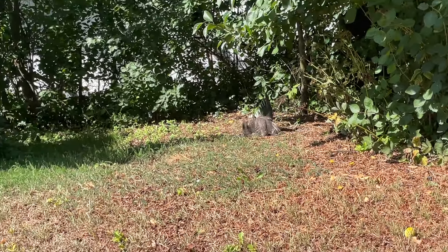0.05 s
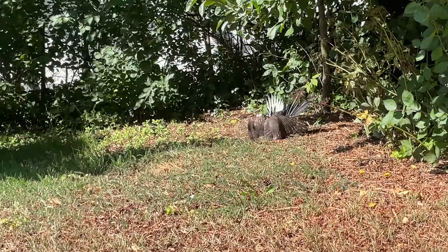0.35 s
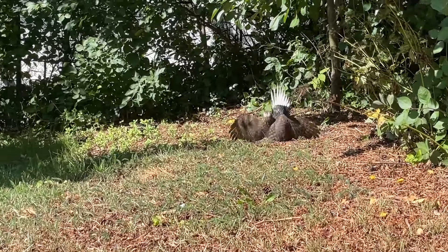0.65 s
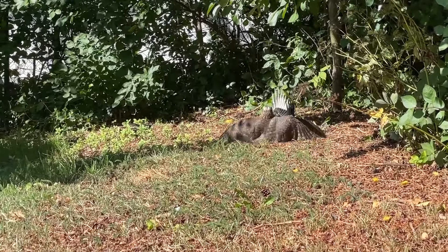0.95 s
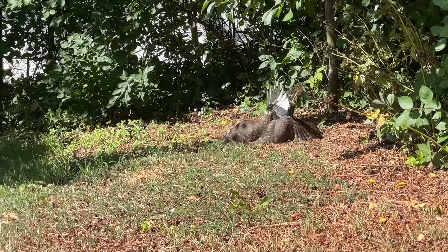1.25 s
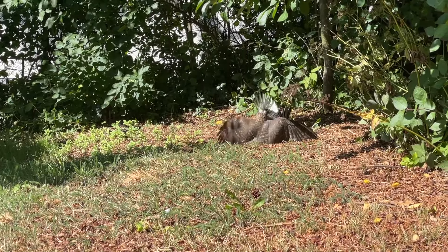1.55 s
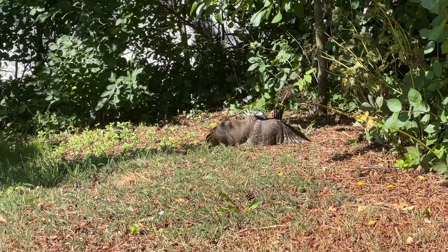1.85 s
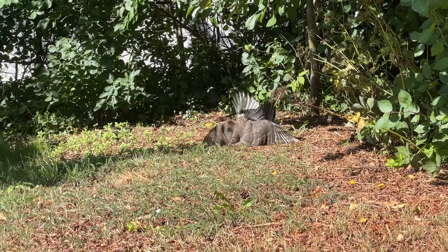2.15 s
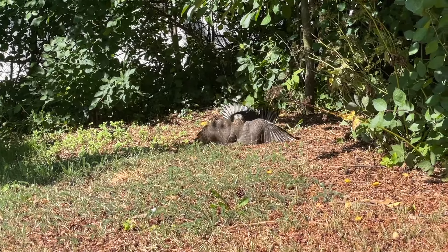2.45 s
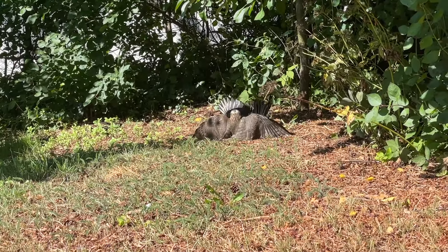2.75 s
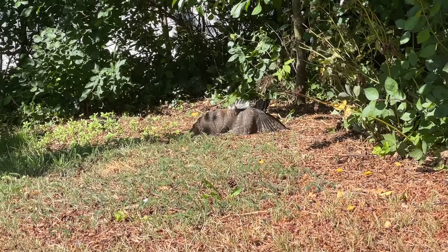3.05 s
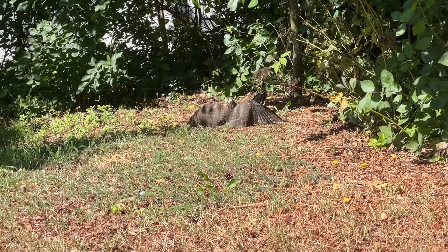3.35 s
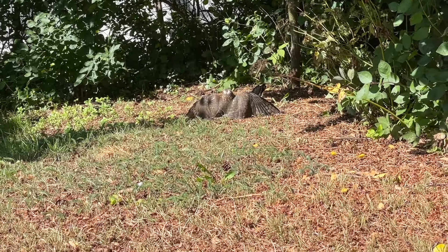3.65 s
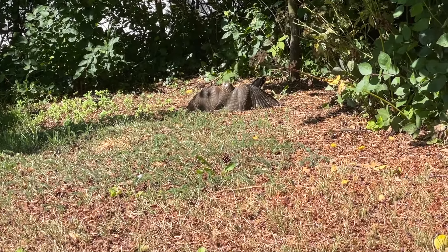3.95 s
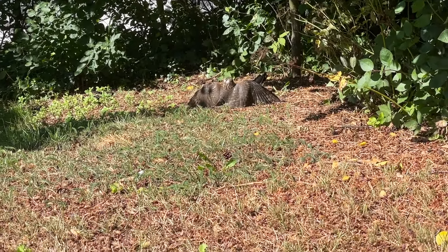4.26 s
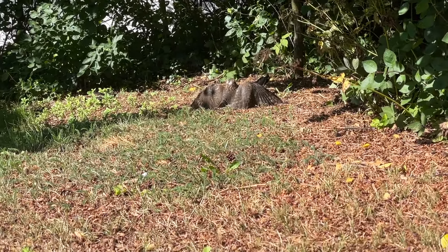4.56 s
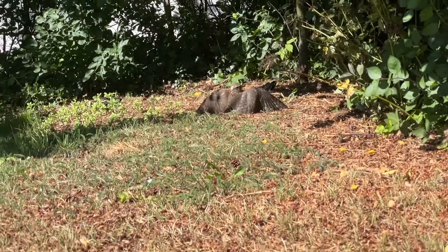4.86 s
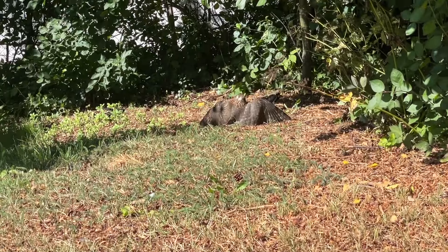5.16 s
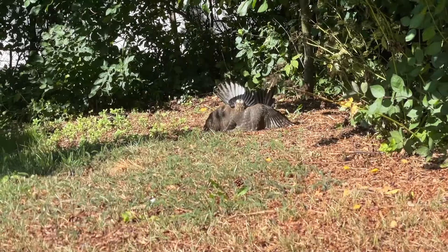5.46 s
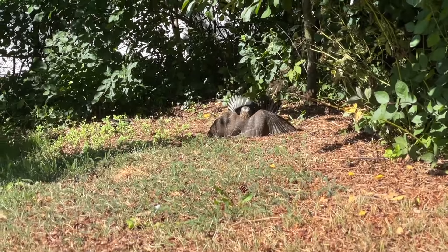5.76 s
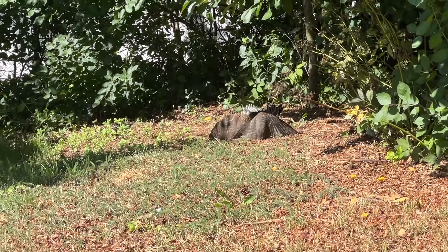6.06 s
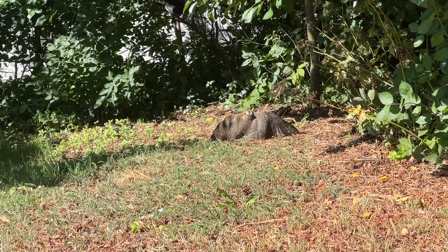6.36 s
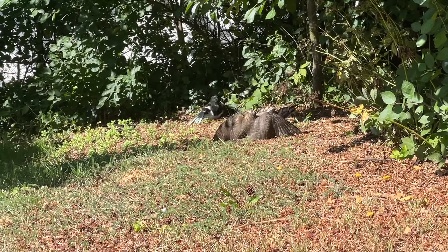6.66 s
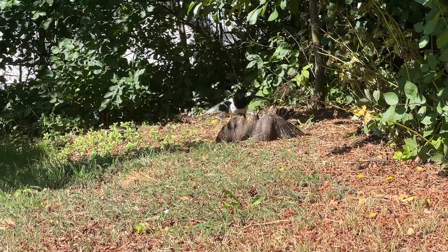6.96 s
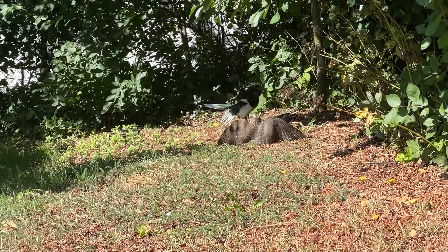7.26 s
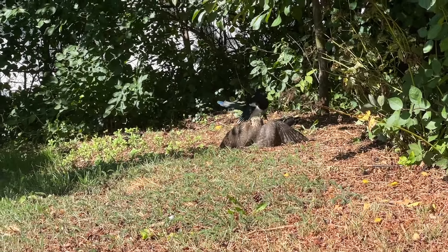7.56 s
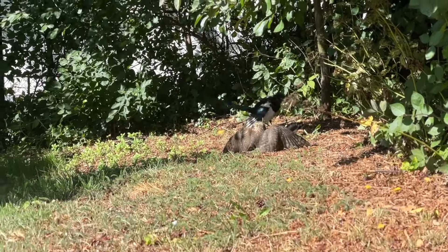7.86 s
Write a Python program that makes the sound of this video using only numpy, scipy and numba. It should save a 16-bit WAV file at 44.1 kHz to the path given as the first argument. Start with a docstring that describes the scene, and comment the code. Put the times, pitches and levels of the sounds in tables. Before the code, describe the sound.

A magpie screams in distress on a garden lawn, several metres away, with a slight echo from a hedge. It opens with a brief rasp and a long nasal wail lasting to 0.8 seconds. An arching squawk breaks into a rasp around 1 second, followed by another wail that drops in pitch and more squawks from 1.6 to 2.4 seconds. From about 2.4 to 4 seconds comes the loudest part, a fast stuttering run of harsh chatter, roughly ten notes a second. The bird pauses until 5.2 seconds, when a rising squawk leads into a wail lasting to 6.4 seconds. A more strained, piercing wail runs from 6.6 to 7.3 seconds, and a weaker raspy call follows from 7.6 seconds to the end near 8. A faint outdoor rumble and distant hum lie underneath, with occasional soft wind thumps on the microphone.

```python
"""Magpie in distress on a lawn

A magpie screams some metres away, in front of a hedge. Membranes on the two sides of its syrinx chop
the breath into pulses, which throat and beak filter. Arching squawks from the high side break into rasps
and settle into long nasal wails from the low side; in the middle comes a fast run of harsh chatter.
The hedge scatters it all back over a faint outdoor rumble."""
import sys
import numpy as np
from scipy import signal
from scipy.fft import rfft, irfft, next_fast_len
from scipy.io import wavfile
from scipy.ndimage import uniform_filter1d
from numba import njit

SR = 44100
rng = np.random.default_rng(int(sys.argv[2]) if len(sys.argv) > 2 else 0)


def wav_record(signal):
    """Record a signal, one row per channel, as 16-bit PCM in the file named by sys.argv[1]."""
    frames = np.transpose(np.atleast_2d(signal))
    bounded = np.clip(frames, -1, 1)
    # unit amplitude maps onto the largest positive 16-bit level
    quanta = np.round(bounded * 32767).astype(np.int16)
    wavfile.write(sys.argv[1], SR, quanta)


N = 349261
TIME = np.arange(N) / SR
SIZE = next_fast_len(N + SR)
FREQS = np.maximum(np.arange(SIZE // 2 + 1) * SR / SIZE, 1)


def from_db(db):
    """Amplitude ratio of a level in decibels."""
    return 10 ** (np.asarray(db) / 20)


def ramp(x):
    """Limit to the range 0 to 1."""
    return np.clip(x, 0, 1)


def rms_one(x):
    """Normalise to rms 1."""
    return x / np.sqrt(np.mean(x ** 2) + 1e-20)


def levelled(x, size=900):
    """Hold the moving rms over `size` samples near 1."""
    return x / np.sqrt(np.abs(uniform_filter1d(x ** 2, size)) + 1e-12)


def in_time(rows):
    """Interpolate each column of a time curve at every sample."""
    times, *columns = np.transpose(rows)
    return [np.interp(TIME, times, column) for column in columns]


def per_call(curves):
    """Interpolate the curve of the nearest call, held beyond its ends."""
    columns = in_time(curves[0])
    for before, curve in zip(curves, curves[1:]):
        columns = np.where(TIME > (before[-1][0] + curve[0][0]) / 2, in_time(curve), columns)
    return columns


def at_hz(points, hz):
    """Interpolate a spectrum on a log-frequency axis."""
    f, value = np.transpose(points)
    return np.interp(np.log(hz), np.log(f), value)


def low_pass(hz, power):
    """Zero-phase low-pass response, half amplitude at hz."""
    return 1 / (1 + (FREQS / hz) ** power)


def filtered(x, response):
    """Convolution, as a product of spectra."""
    return irfft(rfft(x, SIZE) * response, SIZE)[..., :N]


def coloured(x, spectrum):
    """Spectral shaping by a curve in decibels; rms 1."""
    return rms_one(filtered(x, from_db(at_hz(spectrum, FREQS))))


def flutter(rate_hz):
    """Random modulation up to about the given rate; rms 1."""
    return rms_one(filtered(rng.standard_normal(N), low_pass(rate_hz, 2)))


def band_noise(hz, sharpness):
    """Band-pass noise around one frequency; rms 1."""
    detuning = FREQS / hz - hz / FREQS
    return rms_one(filtered(rng.standard_normal(N), 1 / (1 + (sharpness * detuning) ** 2)))


def wide_noise(spectrum, side_db):
    """Noise from all around is only partly coherent between left and right."""
    mid, side = coloured(rng.standard_normal((2, N)), spectrum)
    return mid + from_db(side_db) * side * [[1], [-1]]


@njit
def resonance(x, hz, width_hz):
    """A damped resonator with a moving centre frequency and peak gain 1."""
    r = np.exp(-np.pi * width_hz / SR)
    y = np.zeros(len(x))
    for i in range(2, len(x)):
        drive = (1 - r * r) / 2 * (x[i] - x[i - 2])
        y[i] = drive + 2 * r * np.cos(2 * np.pi * hz[i] / SR) * y[i - 1] - r * r * y[i - 2]
    return y


def breeze(gain_db=0.5, gust_db=1.8):
    """Pressure fluctuations of moving air make a rumble, which freshens once."""
    # strength of the breeze: t/s, level/dB
    strength = [(0, -63), (2.9, -62.5), (4.2, -58.5), (4.7, -56.5), (7.92, -57.5)]
    # spectrum of the rumble: f/Hz, relative density/dB
    spectrum = [(20, -26), (55, -1.5), (90, -5.5), (160, -13), (300, -19.5), (1000, -49), (15000, -82)]
    level_db = in_time(strength)[0] + gain_db + gust_db * flutter(4)
    return from_db(level_db) * wide_noise(spectrum, side_db=-17)


def distant_noise(level_db=-63.5, rush_hz=295):
    """Two noises superpose: a steady distant one and a low rush that swells behind the chatter."""
    # distant background: f/Hz, relative density/dB
    spectrum = [(40, -10), (150, 0), (280, -5), (500, -8.5), (1000, -10), (2000, -20), (3000, -23),
                (4500, -37), (8000, -43), (15000, -49.5)]
    # swell of the rush: t/s, level/dB
    swell = [(2.3, -93), (2.4, -64.5), (3, -64), (3.3, -61), (3.45, -86)]
    steady = from_db(level_db) * wide_noise(spectrum, side_db=-5)
    return steady + from_db(in_time(swell)[0]) * band_noise(rush_hz, sharpness=2.4)


def far_hum(hz=735):
    """A faint pure tone, randomly modulated in amplitude and frequency."""
    # swell and fade of the hum: t/s, level/dB
    swell = [(0, -66.5), (4.1, -64.5), (5.1, -71.5), (7.92, -68)]
    amplitude = np.sqrt(2) * from_db(in_time(swell)[0] + 2 * flutter(11))
    phase = 2 * np.pi * np.cumsum(hz + 3 * flutter(5.4)) / SR
    return amplitude * np.sin(phase + [[1], [-1]])


def wind_puffs(width_s=0.034, hz=50):
    """Brief pressure swings of air on the microphones make soft low thumps."""
    # crests of the puffs: t/s, level/dB
    puffs = [(.70, -50), (.95, -52), (1.72, -53), (3.08, -50), (3.46, -49), (4.15, -49), (4.57, -55.5),
             (4.93, -50.5), (5.11, -51.5), (6.455, -43), (7.121, -53), (7.24, -48.5), (7.33, -43),
             (7.62, -47.5)]
    envelope = sum(from_db(db) * np.exp(-((TIME - s) / width_s) ** 2) for s, db in puffs)
    return envelope * levelled(band_noise(hz, sharpness=1), size=2000)


def garden(x, near_db=-11, hedge_db=-22, tail_db=-15, hedge_s=0.032, spread_s=0.03):
    """Scattering: a quick echo from leaves and trunks, a later one from the hedge, then a dull tail."""
    # reverberation time of the garden: f/Hz, T60/s
    t60 = [(500, 0.9), (2000, 0.51), (5000, 0.4), (12000, 0.37)]
    t = TIME[:SR]
    near = rng.standard_normal(SR) * (rng.random(SR) < .05) * np.exp(-t / .011) * (t > .002)
    hedge = band_noise(hz=2150, sharpness=2.91)[:SR] * np.exp(-((t - hedge_s) / spread_s) ** 2)
    edges_hz, tail = np.geomspace(300, 16000, 7), 0
    for low, high in zip(edges_hz, edges_hz[1:]):
        band_pass = signal.butter(2, [low, high], "band", fs=SR, output="sos")
        band = signal.sosfilt(band_pass, rng.standard_normal(SR))
        tail = tail + band * from_db(-60 * t / at_hz(t60, np.sqrt(low * high))) * (t > .012)
    paths = (near_db, near), (hedge_db, hedge), (tail_db, tail)
    echo = sum(from_db(db) * path / np.sqrt(np.sum(path ** 2)) for db, path in paths)
    return x + filtered(x, rfft(echo, SIZE))


def side_scatter(x, level_db=-18):
    """Leaves scatter short wavelengths most; this part reaches left and right in antiphase."""
    leaves = rng.standard_normal(SR) * np.exp(-TIME[:SR] / .02)
    response = rfft(leaves / np.sqrt(np.sum(leaves ** 2)), SIZE) * np.minimum(FREQS / 3000, 1.5) ** 2
    return from_db(level_db) * filtered(x, response) * [[1], [-1]]


def undergrowth(x):
    """Multipath through grass and stems, as all-pass dispersion, smears each pulse over milliseconds."""
    for lag in (23, 41, 67):  # samples
        taps = np.r_[.55, np.zeros(lag - 1), 1]
        x = signal.lfilter(taps, taps[::-1], x)
    return x


def ground_bounce(x, delay_s=0.001304, sway=0.075):
    """Interference: as the bird struggles its ground echo shifts, so upper partials swell and fade."""
    bounce = np.interp(TIME - delay_s * (1 + sway * flutter(5.2)), TIME, x)
    return x + .72 * (bounce - filtered(bounce, low_pass(2800, 6)))


def membrane(pitch_hz, doubling, rough, jitter, shimmer, hiss, slip_s=1.7e-5, overtones=None):
    """One side of the syrinx is a valve: a sharp pulse per cycle, and turbulence while it is open."""
    # turbulence in the syrinx: f/Hz, level/dB
    turbulence = [(1200, -17), (2000, -7), (3100, 1.5), (6000, 1), (12000, -1)]
    steady_cycles = np.cumsum(pitch_hz * np.exp(jitter * rough ** 1.4 * flutter(150))) / SR
    # each closure comes a little early or late, which frays the highest partials
    cycles = steady_cycles + pitch_hz * slip_s * flutter(400)
    within = cycles - np.round(cycles)
    opening = np.cos(np.pi * within) ** 2
    pulses = np.sinc(.75 * within * SR / pitch_hz) * opening
    partial_amplitude = 2 * pitch_hz / (.75 * SR)
    fade_s = 0.011
    for number, spans in (overtones or {}).items():
        for start, end, boost_db in spans:
            on = slice(max(int((start - fade_s) * SR), 0), int((end + fade_s) * SR))
            gate = ramp(np.minimum(TIME[on] - start, end - TIME[on]) / fade_s + .5)
            partial = partial_amplitude[on] * np.cos(2 * np.pi * int(number) * steady_cycles[on])
            pulses[on] += (from_db(boost_db) - 1) * gate * partial
    # period doubling weakens every other pulse
    strength = (1 - ramp(doubling) * (np.round(cycles) % 2)) * from_db(shimmer * rough * flutter(175))
    puffs = rms_one(coloured(rng.standard_normal(N), turbulence) * opening)
    return levelled(strength * (rms_one(pulses) + hiss * rough * puffs))


def throat(source, beak, windpipe, levels_db):
    """Source and filter: two formants (f/Hz, width/Hz, gain/dB) and the ground echo colour a scream."""
    # response of the screaming throat: f/Hz, gain/dB
    response = [(350, -28.5), (700, -13.5), (1080, -7.5), (1450, 0), (1750, 1), (2050, -3), (2500, -7),
                (3300, -8), (4000, -2), (5400, -6.5), (7000, -12.5), (8000, -10.5), (9300, -12),
                (10600, -16.5), (12200, -20), (13200, -24.5), (14200, -30.5), (15200, -36)]
    voice = coloured(source, response)
    for hz, width_hz, gain_db in (beak, windpipe):
        voice = voice + from_db(gain_db) * resonance(voice, hz, float(width_hz))
    voice = ground_bounce(voice)
    body, below_treble = low_pass(1950, 20), low_pass(3400, 20)
    bands = body, below_treble - body, 1 - below_treble  # body, beak band, treble
    return sum(from_db(db) * levelled(filtered(voice, band)) for db, band in zip(levels_db, bands))


def chatter(pitch_hz=340, crest_s=0.029, rise_db=13, fall_db=12, fall_s=0.036, gain_db=-0.03):
    """Chaotic vibration: the membranes slap irregularly in notes that snap open, swell and die."""
    # notes: start t/s, crest level/dB, relative treble level/dB, relative snap level/dB
    notes = [(2.446, -36, -1, -2), (2.515, -32, 1, 2), (2.585, -29, 0, -10), (2.671, -27, 1.5, -24),
             (2.762, -30, 1.5, -9), (2.864, -30.5, 2, -9), (2.965, -31, 2.5, -5.5),
             (3.067, -29.5, 1, -10.5), (3.165, -30, 1, -10.5), (3.265, -29, 3, -26),
             (3.377, -29, 2.5, -16.5), (3.492, -29.5, 3.5, -13.5), (3.599, -29.5, 4.5, -21),
             (3.703, -29.5, 4, -17), (3.805, -29.5, 2, -16.5), (3.917, -28.5, 2.5, -11)]
    # response of the chattering throat: f/Hz, gain/dB
    response = [(350, -23), (700, -15), (1100, -2.5), (1850, 3), (2250, -2), (2750, -1), (3500, -10.5),
                (4200, -17), (5000, -11.5), (6500, -15.5), (9000, -12), (10300, -22.5), (11400, -18.5),
                (12700, -30), (14000, -27.5), (15200, -44.5)]
    # narrow resonances of the open throat: f/Hz, width/Hz, gain/dB
    formants = [(1810, 230, 0.5), (2596, 400, 1), (4765, 620, 0.5)]
    slaps = membrane(pitch_hz, doubling=.2, rough=1, jitter=.3, shimmer=2, hiss=1.1)
    slaps = coloured(ground_bounce(slaps), response)
    stretch = np.exp(0.075 * flutter(8.2))  # the neck is never held quite still
    ringing = sum(from_db(db) * resonance(slaps, hz * stretch, float(bw)) for hz, bw, db in formants)
    voice = levelled(slaps + ringing)
    body = filtered(voice, low_pass(3600, 10))
    treble, out = voice - body, np.zeros(N)
    for start, level_db, treble_db, snap_db in notes:
        note = slice(int(start * SR), int((start + .14) * SR))
        t = TIME[note] - start - crest_s
        swell = from_db(-np.where(t < 0, rise_db * (t / crest_s) ** 2, fall_db * (t / fall_s) ** 2))
        snap = from_db(snap_db) * np.exp(-(t + crest_s) / .001)
        tone = body[note] + from_db(treble_db) * treble[note]
        out[note] += from_db(level_db + gain_db) * (swell + snap) * tone
    return out


def squawks(waver=0.00505, release_db=15, edge_s=0.019, break_s=0.016, reference_hz=570):
    """Period doubling: the high side's arching squeal clears as it swells, then breaks into a rasp."""
    # squawks: start t/s, break t/s, end t/s, level/dB, swell time/s, swell depth/dB, release time/s,
    # relative body level/dB, relative treble level/dB, beak f/Hz, rasp (0-1), sag after break/(dB/s),
    # windpipe f/Hz, windpipe gain/dB; both resonances are given at the reference pitch
    calls = [(-.05, -0.022, 0.086, -32, 0.041, 10, 0.052, -7.5, -3.5, 2930, 0.93, 5, 5700, -10),
             (0.81, 1.06, 1.123, -34.5, 0.15, 12, 0.025, -6, -3, 2380, 0.63, -5, 5460, -5),
             (1.556, 1.779, 1.807, -37, 0.1, 5, 0.056, -14, -4, 2940, 0.9, 0, 5500, -2),
             (1.938, 2.112, 2.354, -34, 0.11, 14, 0.1, -9, -3.5, 2520, 0.97, -2, 5166, -1),
             (2.317, 2.374, 2.48, -53.5, 0.023, 6, 0.01, 3.5, -4.5, 1580, 0.99, -3, 5240, -6),
             (5.187, 5.438, 5.575, -36, 0.16, 30.5, 0.022, -7, -2, 2584, 1, 42, 6066, -14),
             (6.529, 6.78, 6.9, -50, 0.16, 17, 0.064, 3, 4, 2708, 0.48, 2, 4750, 3),
             (7.594, 7.605, 8.12, -50, 0.013, 13, 0.059, -5, -10, 2327, 0.97, 8, 5310, -6)]
    # fundamental of the high side, one arch per squawk: t/s, f/Hz
    arches = [
        [(0, 451.4), (.07, 437.7)],
        [(.83, 405), (.89, 465), (.906, 518), (.926, 569), (.95, 596), (.982, 586), (1.005, 532),
         (1.022, 553.7), (1.042, 528), (1.07, 542.4), (1.106, 577), (1.158, 530)],
        [(1.55, 503.5), (1.595, 580), (1.63, 529), (1.668, 549), (1.7, 513), (1.735, 483.8), (1.762, 547.6),
         (1.778, 508), (1.8, 425)],
        [(1.95, 356.3), (1.978, 403), (1.998, 456.6), (2.018, 570), (2.048, 590), (2.098, 526), (2.138, 597.7),
         (2.178, 642.6), (2.206, 637), (2.23, 625.7), (2.258, 653.3), (2.318, 535)],
        [(2.32, 405), (2.36, 479.5), (2.43, 555)],
        [(5.21, 327), (5.238, 365), (5.334, 511), (5.35, 574), (5.378, 576), (5.39, 608), (5.406, 607),
         (5.418, 639), (5.434, 636.7), (5.458, 677.6), (5.49, 678.3), (5.52, 636), (5.545, 564)],
        [(6.56, 355), (6.64, 404), (6.72, 429), (6.76, 490), (6.85, 511.7)],
        [(7.605, 535), (7.685, 636.6), (7.715, 730), (7.76, 630)],
    ]
    # underlying hoarseness: t/s, roughness (0-1)
    hoarseness = [(.85, .42), (.97, .33), (1.05, .38), (1.7, .3), (2, .16), (2.12, .16), (2.35, .5),
                  (5.25, .25), (5.42, .29), (7.6, .2)]
    # overtones that sing out, by partial number: start t/s, end t/s, boost/dB
    overtones = {"4": [(.94, .99, 5), (1.07, 1.14, 7), (1.57, 1.75, 9), (2.16, 2.32, 13), (5.46, 5.56, 7)],
                 "5": [(1, 1.1, 8), (2.04, 2.12, 5), (1.66, 1.75, 10), (5.385, 5.445, 9)],
                 "7": [(2.02, 2.07, 7), (5.385, 5.415, 10)], "9": [(.94, .99, 9), (2.02, 2.05, 6),
                 (5.41, 5.445, 13)]}
    # round squeal, hollow above its main resonance: f/Hz, gain/dB
    colour = [(600, 0), (1200, -.5), (1800, -2), (2400, 7.5), (3000, 5.5), (3700, -1.5), (4500, -3),
              (5400, 7.5), (6300, 12), (9000, 9.5), (12300, 10)]
    pitch_hz = per_call(arches)[0] * np.exp(waver * flutter(26.4))
    sounding, level, body, treble, beak_hz, pipe_hz, pipe_db, broken, weak = np.zeros((9, N))
    for (start, break_at, end, level_db, swell_s, swell_db, release_s,
         body_db, treble_db, mouth_hz, rasp, sag_db_per_s, neck_hz, neck_db) in calls:
        now = TIME >= start
        swell_left = ramp(1 - (TIME - start) / swell_s)
        effort_db = -swell_db * swell_left ** 1.5 - release_db * ramp(1 - (end - TIME) / release_s)
        sounding += ramp((TIME - start) / edge_s) * ramp((end - TIME) / edge_s)
        sag_db = sag_db_per_s * np.clip(TIME - break_at, 0, end - start)
        level[now] = (level_db + effort_db - sag_db)[now]
        # effort tilts the spectrum from body to treble
        body[now] = (body_db - .207 * effort_db)[now]
        treble[now] = (treble_db + .72 * effort_db)[now]
        broken[now] = ramp(rasp) * ramp((TIME - break_at) / break_s + .5)[now]
        beak_hz[now], pipe_hz[now], pipe_db[now], weak[now] = mouth_hz, neck_hz, neck_db, swell_left[now]
    rough = ramp(in_time(hoarseness)[0] + .52 * broken + .33 * weak)
    high = membrane(pitch_hz, doubling=.06 + .73 * broken, rough=rough, jitter=.014, shimmer=2.2,
                    hiss=1.2, slip_s=8e-6 + 5e-5 * rough ** 2, overtones=overtones)
    lift = pitch_hz / reference_hz  # the resonances rise with the pitch
    voice = throat(coloured(high, colour), beak=(beak_hz * lift ** .58, 690, 11),
                   windpipe=(pipe_hz * lift ** .066, 420, pipe_db),
                   levels_db=(level + body + .5 * broken, level, level + treble))
    return voice * ramp(sounding) * from_db(2 * rough * flutter(60))


def wails(waver=0.00117, lead_s=0.092, stop_s=0.0053, easy_db=-45.5, strained_db=-32.5):
    """Biphonation: the low side holds a nasal tone; as it grows hoarse the high side rattles along."""
    # force of each wail: t/s, body level/dB, beak band level/dB, treble level/dB, beak resonance f/Hz
    calls = [
        [(0.08, -44, -42, -47.5, 2110), (0.12, -43.5, -47.5, -51.5, 2110), (0.176, -41, -48.5, -46.5, 2270),
         (0.278, -39, -35.5, -40, 2750), (0.34, -37, -39, -43, 1900), (0.512, -34.5, -32, -35.5, 2560),
         (0.556, -34.5, -33.5, -36.5, 2513), (0.628, -33, -30, -35.5, 2440), (0.704, -34.5, -41, -41.5, 2029),
         (0.79, -34, -38, -42, 1988), (0.81, -37.5, -43, -42, 2120)],
        [(1.17, -40.5, -39, -40.5, 2170), (1.192, -41.5, -47, -48.5, 2214), (1.286, -42.5, -51, -46.5, 2140),
         (1.332, -39, -46.5, -47, 2450), (1.378, -44, -43, -44, 2515), (1.408, -36.5, -43, -45.5, 2436),
         (1.526, -39.5, -38.5, -46, 2550), (1.576, -38.5, -38, -41.5, 2134), (1.626, -37, -41, -47, 2330),
         (1.66, -36, -36.5, -39, 2328), (1.745, -38.5, -40.5, -53, 2430)],
        [(5.58, -47, -44, -70, 2415), (5.612, -49, -48.5, -55.5, 2554), (5.818, -42.5, -44, -44, 2674),
         (5.946, -40, -45.5, -46, 2350), (6.04, -41, -45.5, -42, 2777), (6.072, -41, -43.5, -47, 2420),
         (6.144, -40, -45.5, -40, 2805), (6.18, -36, -44, -40.5, 2320), (6.306, -42, -43.5, -40, 2240),
         (6.398, -38, -37.5, -43.5, 2535), (6.428, -39, -33, -43.5, 2302)],
        [(6.585, -51.5, -54.5, -59, 2596), (6.619, -48.5, -41.5, -40, 2370), (6.691, -50.5, -45, -42, 2783),
         (6.777, -47, -38, -36, 2618), (6.98, -40, -35, -30.5, 2556), (7.05, -40, -32.5, -30.5, 2400),
         (7.077, -39.5, -35, -34.5, 2503), (7.127, -45, -33.5, -32, 2392), (7.135, -38.5, -33, -32.5, 2326),
         (7.319, -43.5, -37, -39, 2620), (7.33, -40.5, -37.5, -46, 2523)],
        [(7.73, -64, -52, -59, 2266), (7.736, -60, -53, -55.5, 2297), (7.826, -53, -54, -50.5, 2492),
         (7.92, -56, -45.5, -50, 2402)],
    ]
    # fundamental of the low side, one curve per wail: t/s, f/Hz
    pitches = [
        [(0.06, 342), (0.108, 347.5), (0.16, 330.5), (0.2, 345.5), (0.32, 338.5), (0.356, 348), (0.448, 341.8),
         (0.476, 335.7), (0.528, 347.7), (0.544, 349.3), (0.6, 356.6), (0.668, 342), (0.696, 343.7),
         (0.748, 338), (0.772, 318), (0.808, 310)],
        [(1.13, 353), (1.166, 352.3), (1.178, 347), (1.206, 361.5), (1.222, 350), (1.334, 344.8), (1.382, 359),
         (1.446, 354.7), (1.47, 340.7), (1.53, 331.3), (1.598, 341.4), (1.63, 333), (1.686, 289), (1.75, 249.9)],
        [(5.55, 327.3), (5.586, 328.8), (5.606, 318), (5.69, 324.5), (5.73, 337), (5.77, 331.7), (5.802, 344.6),
         (5.91, 339.3), (6.006, 363), (6.05, 366), (6.074, 352.6), (6.114, 361), (6.23, 371.4), (6.266, 380.1),
         (6.382, 357), (6.434, 302.5)],
        [(6.585, 370), (6.635, 381.8), (6.724, 375), (6.78, 354.2), (6.86, 363.2), (6.92, 355.2),
         (6.965, 357.8), (7.026, 354.3), (7.068, 339.7), (7.126, 342.6), (7.14, 353.3), (7.2, 344.5),
         (7.276, 331.8), (7.3, 321.8), (7.333, 283.8)],
        [(7.7, 353), (7.728, 364.3), (7.764, 336), (7.836, 334.4), (7.882, 351), (7.92, 335.6)],
    ]
    # upper windpipe resonance, which sinks as the neck stretches: t/s, f/Hz, gain/dB
    windpipe = [(0, 4350, -3), (1.4, 4180, -29), (5.9, 4423, -4), (6.18, 3948, -14), (6.6, 4000, -9),
                (6.95, 4014, 5.5), (7.1, 3900, 3), (7.33, 3838, -2), (7.92, 3930, 7)]
    # hoarseness: t/s, roughness (0-1), power share of the high side (0-1)
    hoarseness = [(.15, .38, .04), (.22, .4, .06), (.28, .5, .35), (.35, .44, .08), (.48, .55, .33),
                  (.7, .44, .07), (.81, .42, .06), (1.17, .42, .12), (1.3, .33, .04), (1.45, .42, .1),
                  (1.6, .48, .18), (1.75, .44, .12), (5.6, .25, .04), (5.72, .33, .16), (5.93, .37, .22),
                  (6, .25, .03), (6.2, .28, .05), (6.36, .3, .06), (6.43, .7, .6), (6.62, .46, .22),
                  (6.85, .44, .27), (7.03, .42, .24), (7.08, .33, .13), (7.27, .35, .14), (7.33, .65, .5),
                  (7.7, .4, .16)]
    # overtones that catch a resonance, by partial number: start t/s, end t/s, boost/dB
    overtones = {"2": [(.45, .8, 6), (1.52, 1.76, 8), (6.6, 7.3, 3)], "3": [(.7, .82, 7), (1.64, 1.76, 9)],
                 "4": [(6.86, 7.3, 3)], "7": [(.5, .66, 11), (6.85, 7.3, 5)], "8": [(5.57, 6.15, 6)],
                 "11": [(1.17, 1.52, 6), (6.14, 6.34, 8), (6.72, 7.28, 4)], "12": [(6.9, 7.05, 4)],
                 "14": [(6.78, 7.28, 3)], "16": [(7.06, 7.28, 4)], "9": [(7.06, 7.28, 5)],
                 "10": [(7.06, 7.28, 5)], "13": [(.06, .34, 10), (1.14, 1.4, 11), (5.7, 6.1, 7)],
                 "15": [(5.7, 6.12, 4), (6.92, 7.06, 6)]}
    # nasal colour of the low side: f/Hz, gain/dB
    nasal = [(700, -10.5), (1050, 0.5), (1400, 3.5), (1750, 0.5), (2100, -0.5), (2800, 2), (4400, -0.5),
             (5500, 4), (9000, 3)]
    # piercing colour of the strained high side: f/Hz, gain/dB
    harsh = [(700, -11.5), (1200, -5), (1800, -0.5), (2400, 5.5), (3000, 7), (4000, -4.5), (4700, 1),
             (5600, -2.5), (9000, -3.5)]
    body_db, beak_db, treble_db, beak_hz = per_call(calls)
    pipe_hz, pipe_db = in_time(windpipe)
    rough, share = ramp(in_time(hoarseness))
    # a wail emerges under the squawk before it and is cut off short
    sounding = sum(ramp((TIME - call[0][0]) / lead_s + 1) * ramp((call[-1][0] - TIME) / stop_s + 1)
                   for call in calls)
    low_hz = per_call(pitches)[0] * np.exp(waver * flutter(20))
    strain = ramp((beak_db - easy_db) / (strained_db - easy_db))
    high_hz = low_hz * (1.3 + .14 * strain)  # strain widens the interval between the sides
    low = membrane(low_hz, doubling=0, rough=rough, jitter=.005, shimmer=1.6, hiss=2.7 * rough,
                   slip_s=5e-6 + 1.8e-5 * rough, overtones=overtones)
    high = membrane(high_hz, doubling=.86, rough=rough, jitter=.05, shimmer=3, hiss=1.2)
    both = np.sqrt(1 - share) * coloured(low, nasal) + np.sqrt(share) * coloured(high, harsh)
    voice = throat(both, beak=(beak_hz, 310, 2), windpipe=(pipe_hz, 280, pipe_db),
                   levels_db=(body_db - .9, beak_db - 1.5, treble_db))
    return voice * sounding * from_db(.5 * rough * flutter(60.5) + .78 * flutter(14))


def scene():
    """Bird and background superpose at two close microphones, which differ in phase in the treble."""
    # phase lead of the left microphone: f/Hz, phase/rad
    phase_lead = [(20, 0), (2000, .03), (3200, .52), (5300, .5), (5700, -1.6), (6800, -.7), (7600, -2.4),
                  (8700, -3.1), (11600, -5), (12600, -6.28)]
    bird = garden(undergrowth(wails() + squawks() + chatter()))
    pair = filtered(bird, np.exp(.5j * at_hz(phase_lead, FREQS) * np.array([[1], [-1]])))
    return pair + side_scatter(bird) + breeze() + distant_noise() + far_hum() + wind_puffs()


def record(dry):
    """Band limiting: an elliptic low-pass cuts steeply above 15.5 kHz."""
    return signal.sosfilt(signal.ellip(10, .2, 80, 15500, fs=SR, output="sos"), dry)


dry = scene()
out = record(dry)
wav_record(out)
```